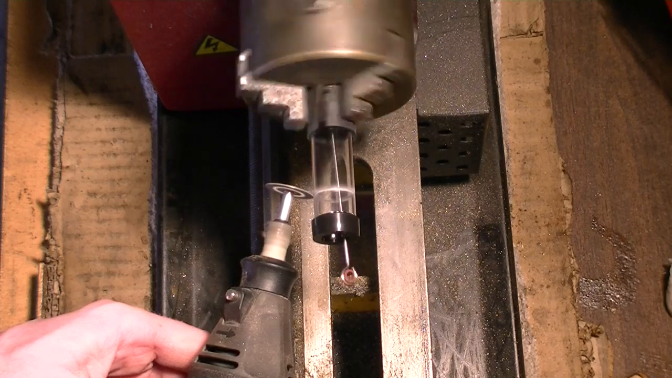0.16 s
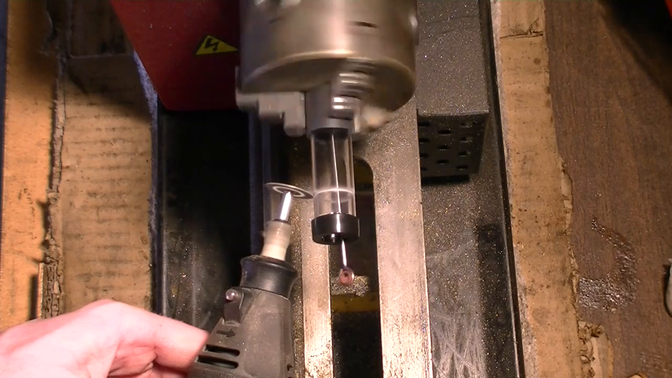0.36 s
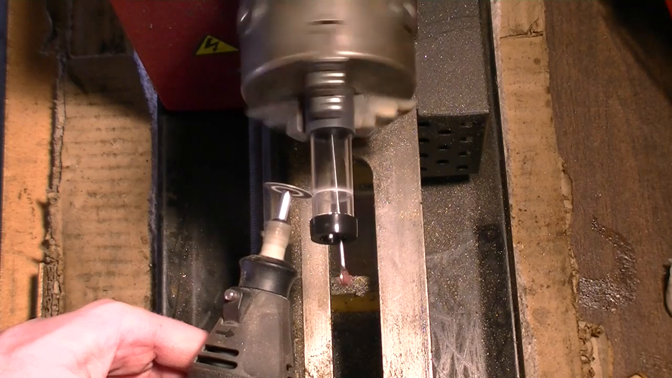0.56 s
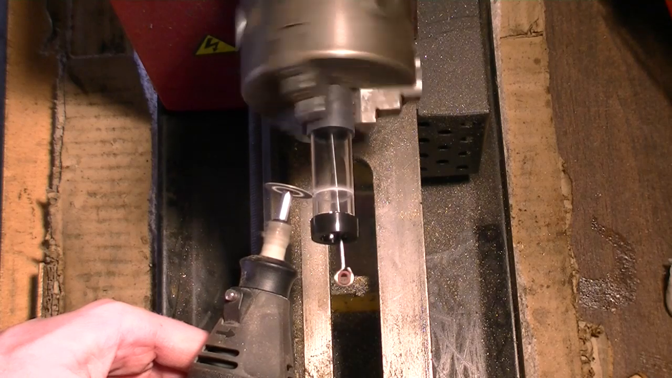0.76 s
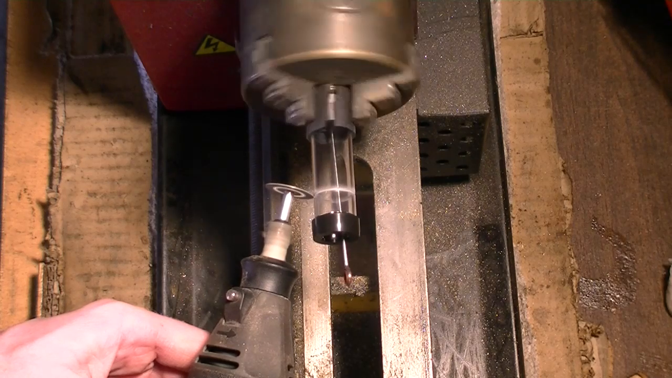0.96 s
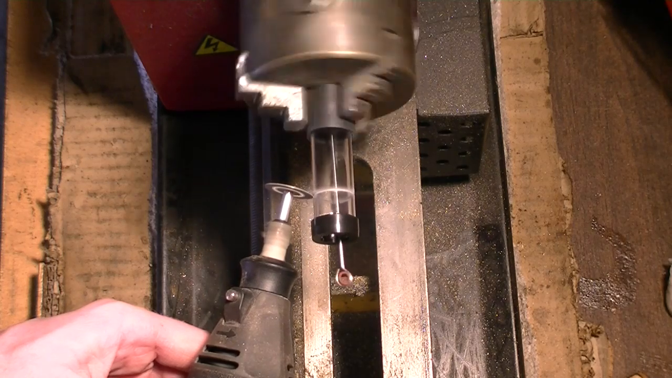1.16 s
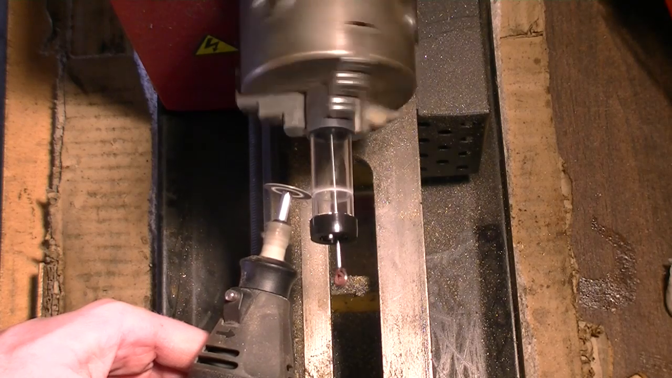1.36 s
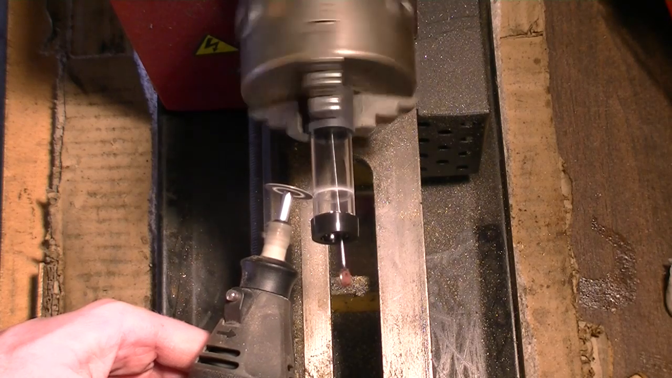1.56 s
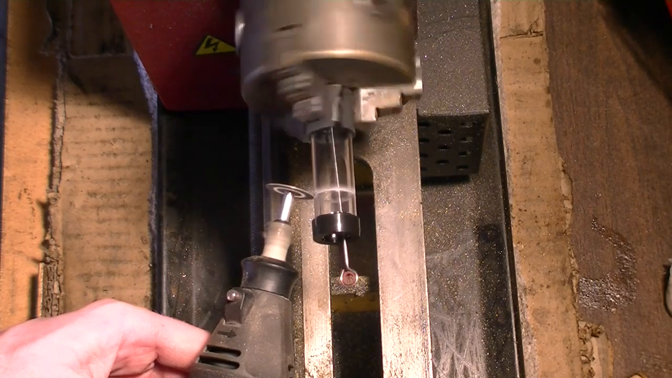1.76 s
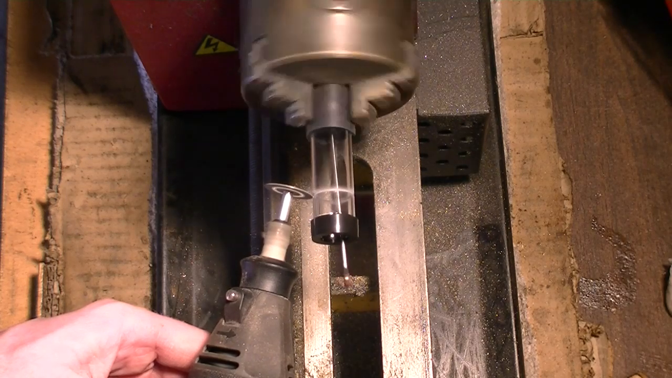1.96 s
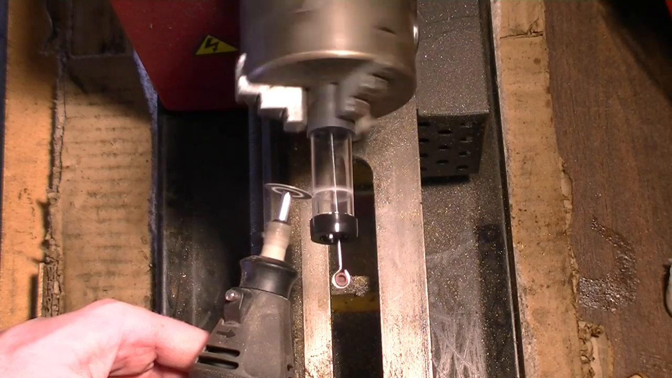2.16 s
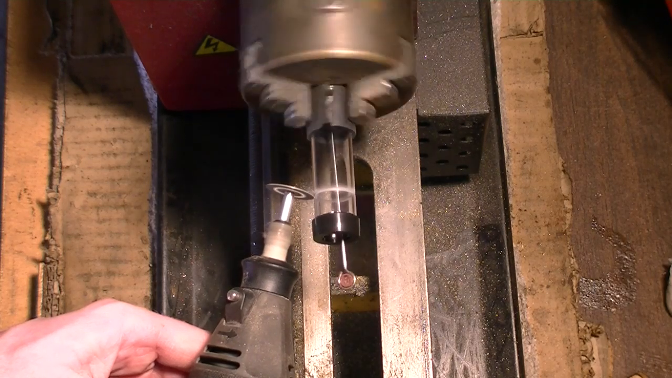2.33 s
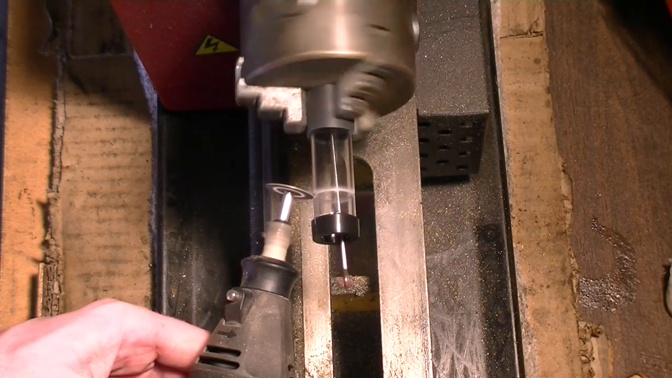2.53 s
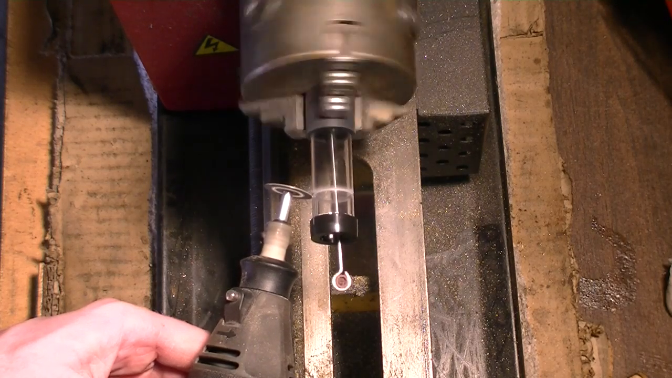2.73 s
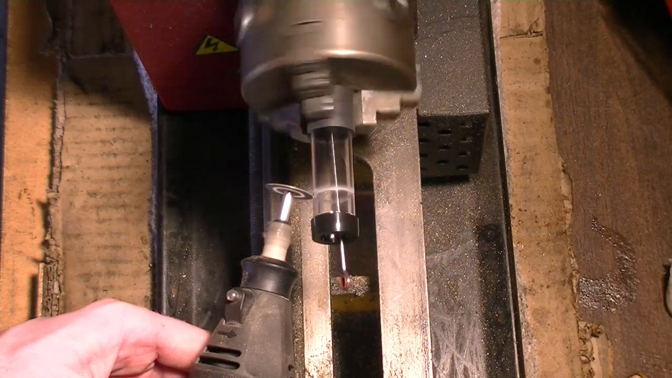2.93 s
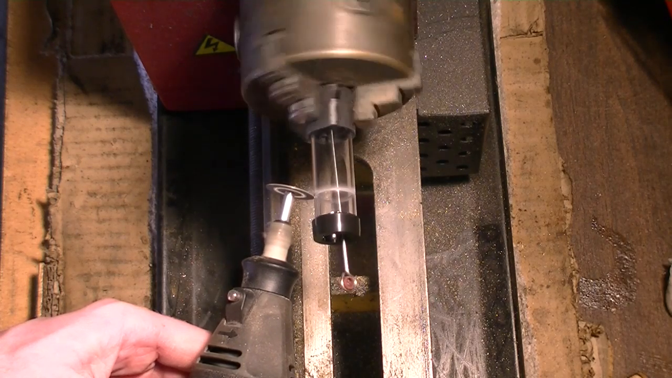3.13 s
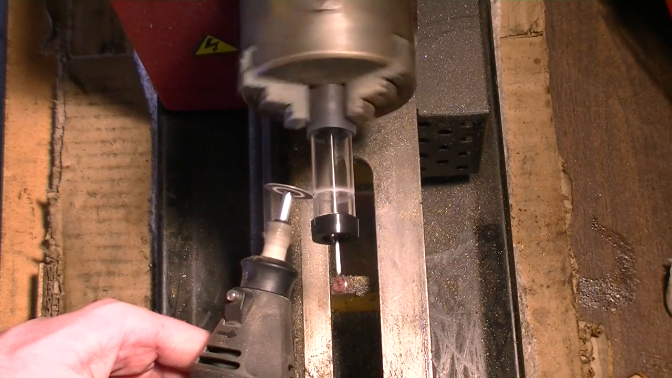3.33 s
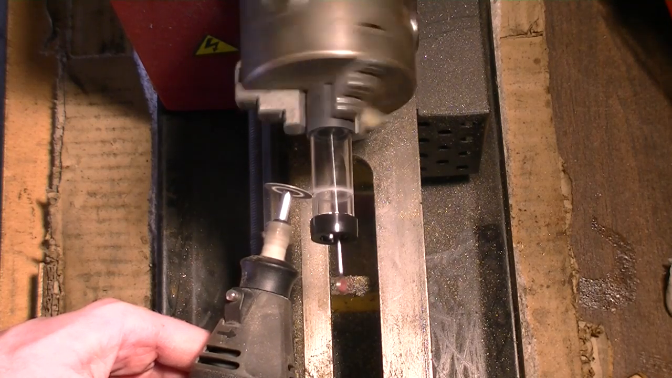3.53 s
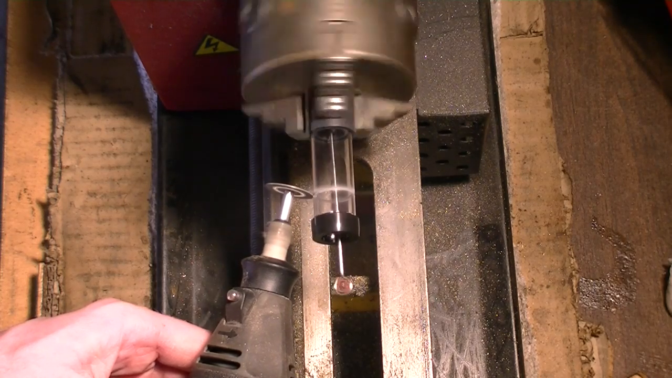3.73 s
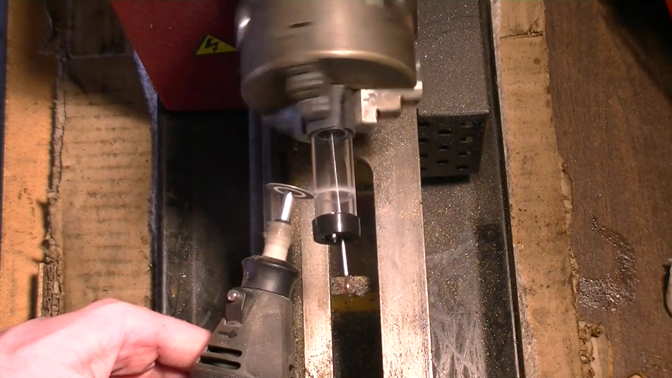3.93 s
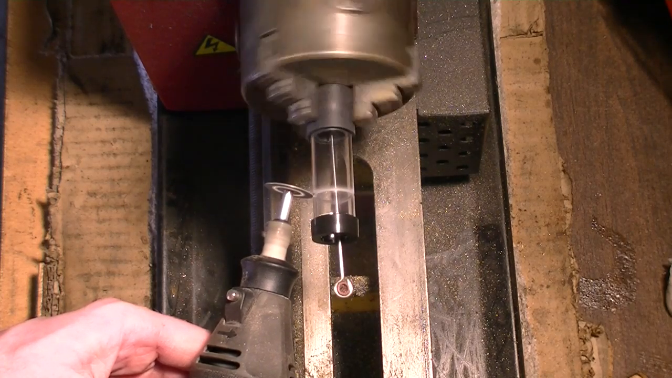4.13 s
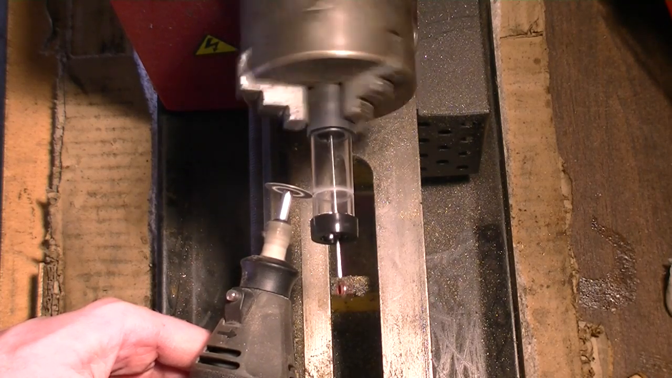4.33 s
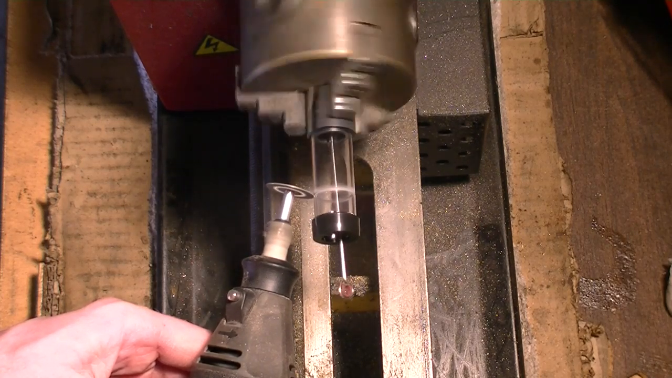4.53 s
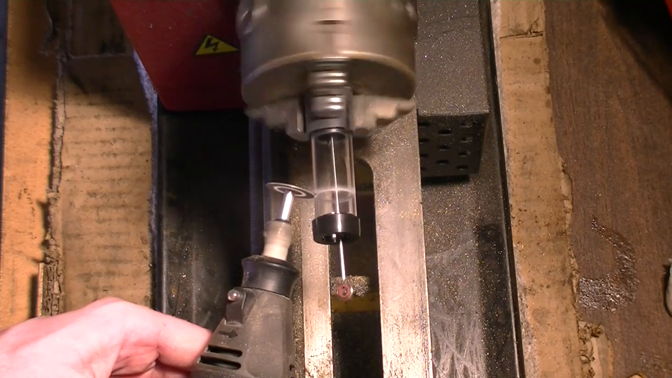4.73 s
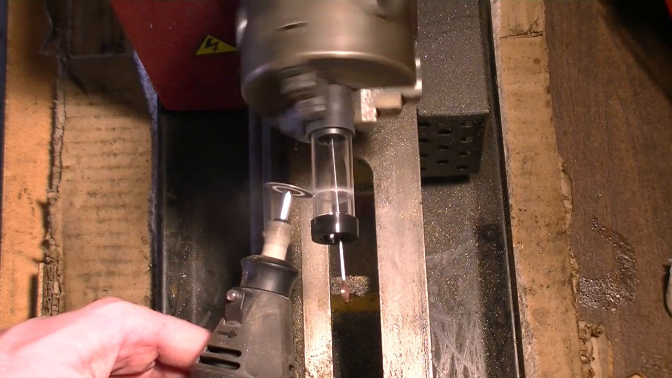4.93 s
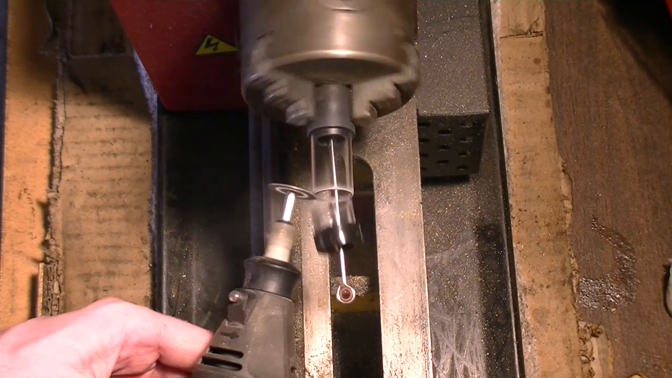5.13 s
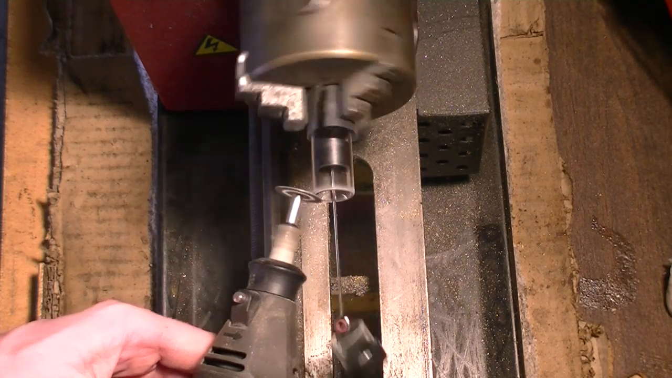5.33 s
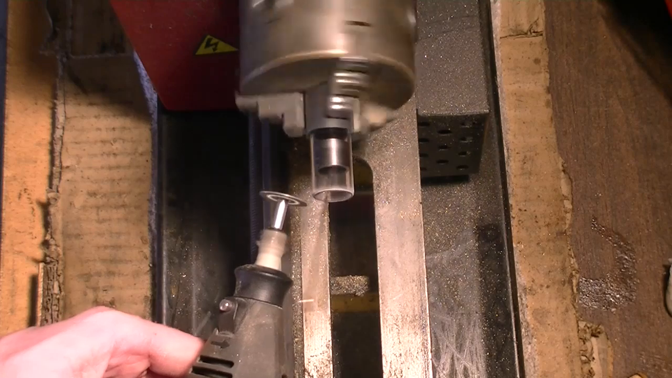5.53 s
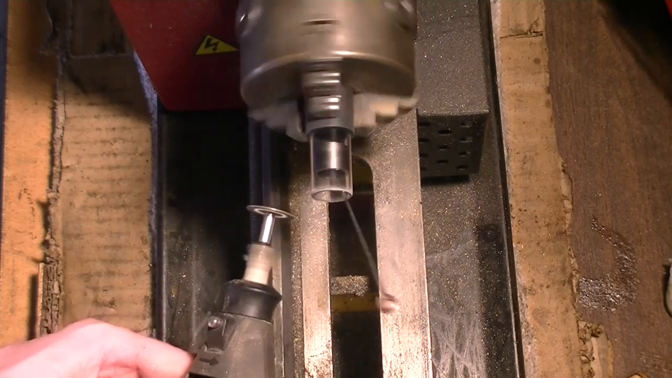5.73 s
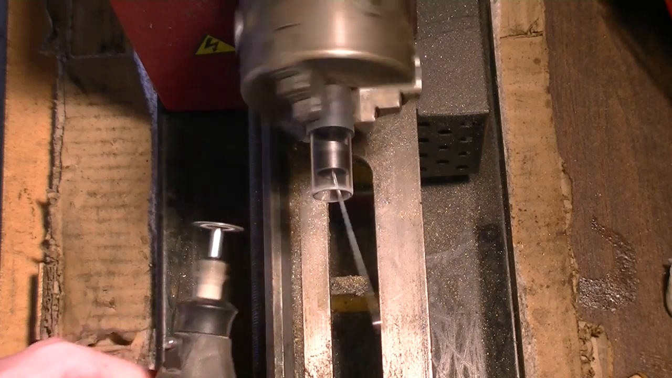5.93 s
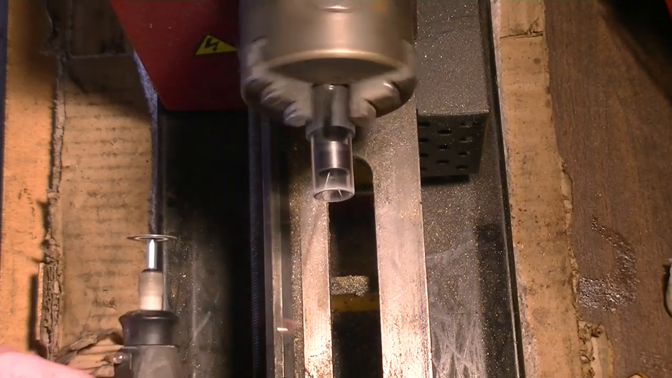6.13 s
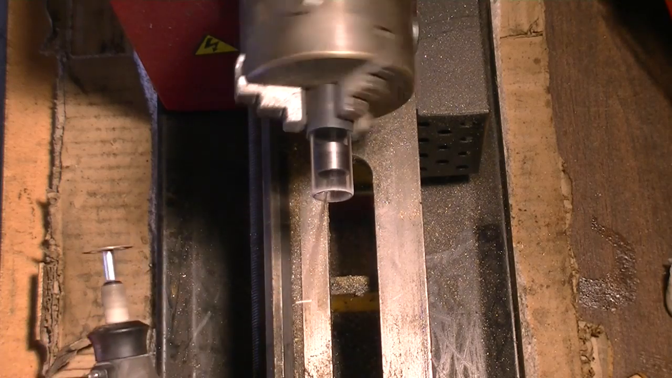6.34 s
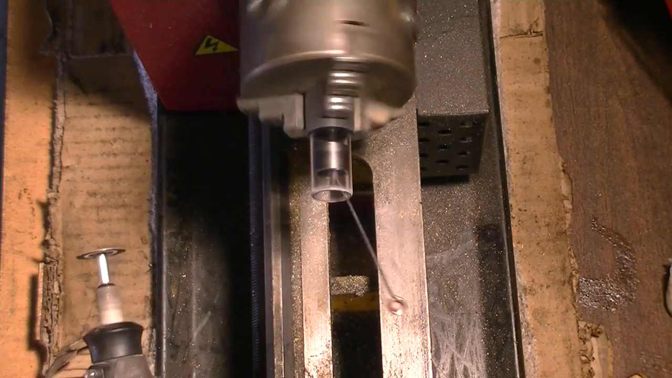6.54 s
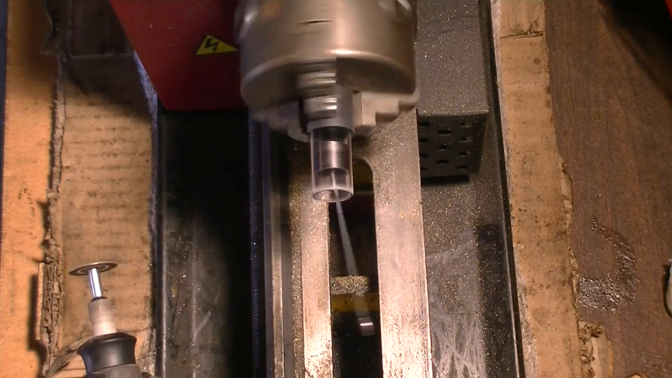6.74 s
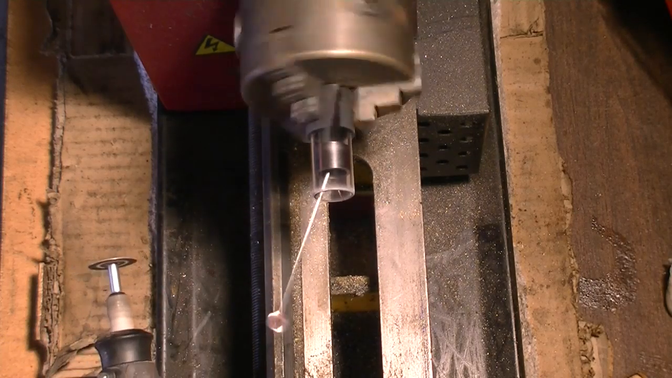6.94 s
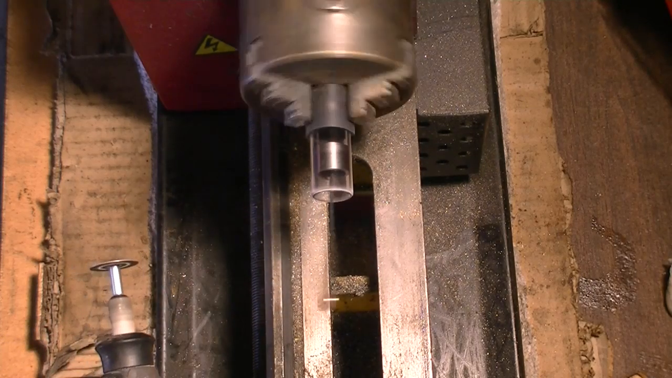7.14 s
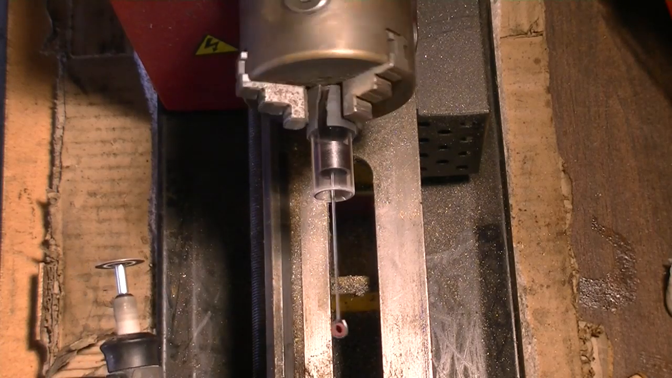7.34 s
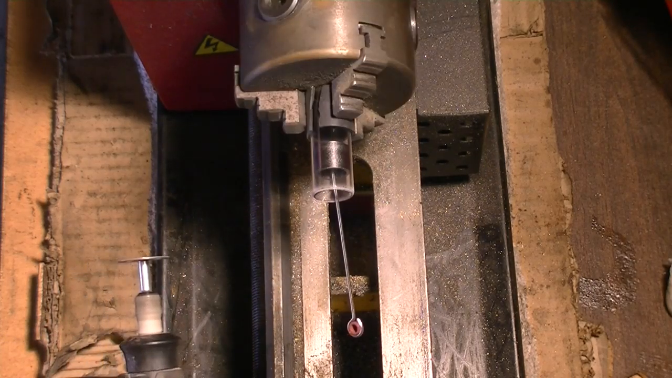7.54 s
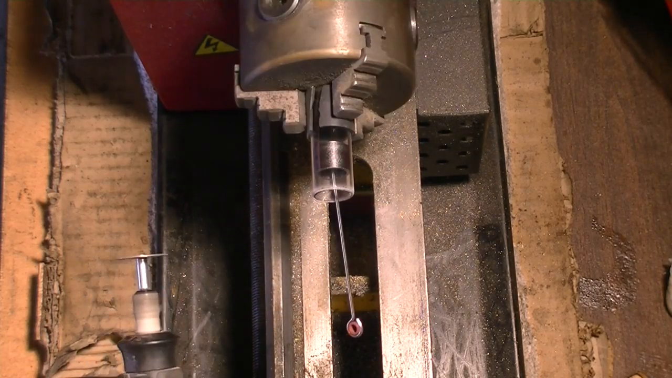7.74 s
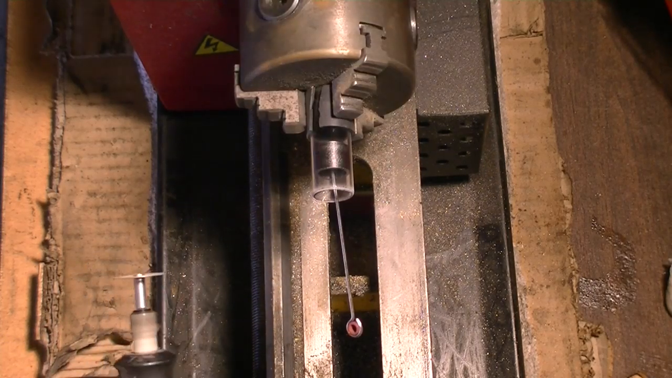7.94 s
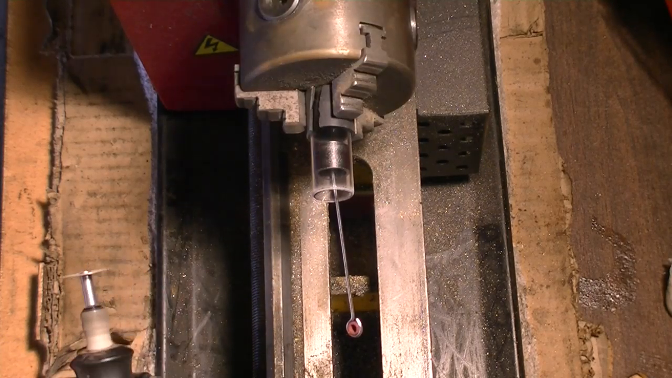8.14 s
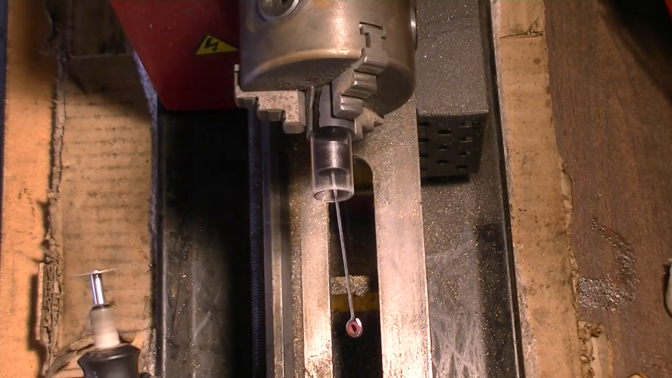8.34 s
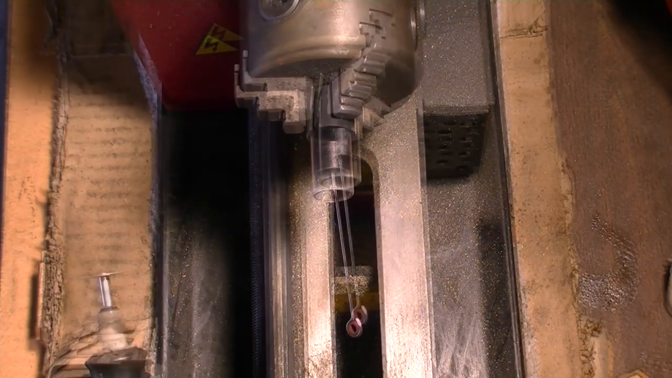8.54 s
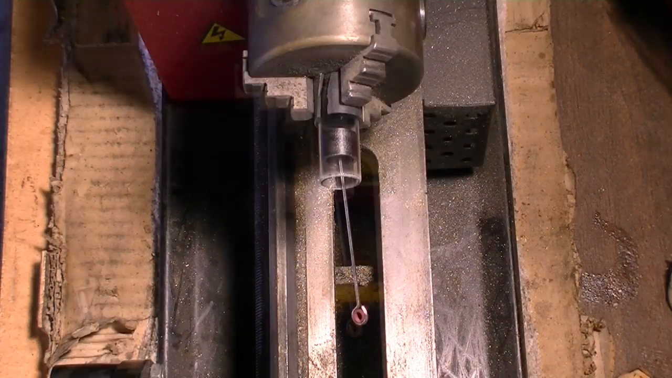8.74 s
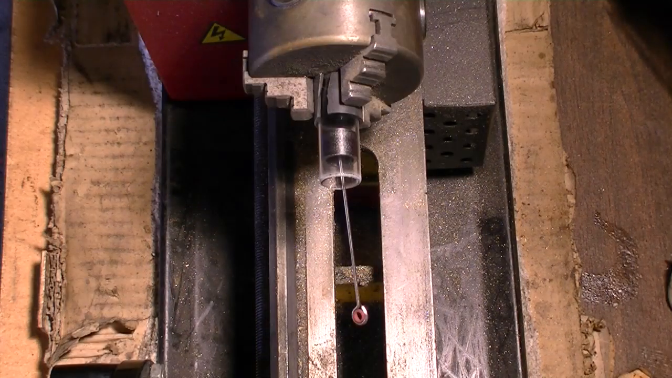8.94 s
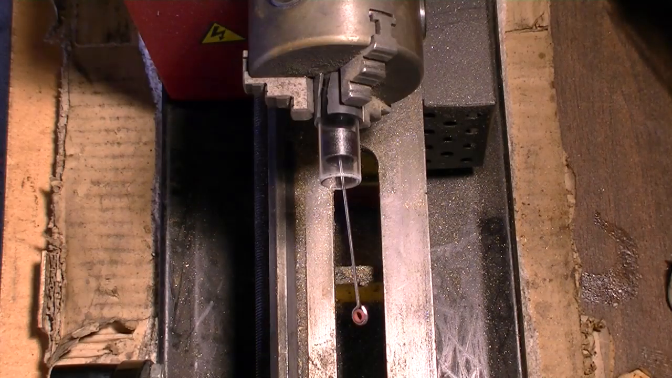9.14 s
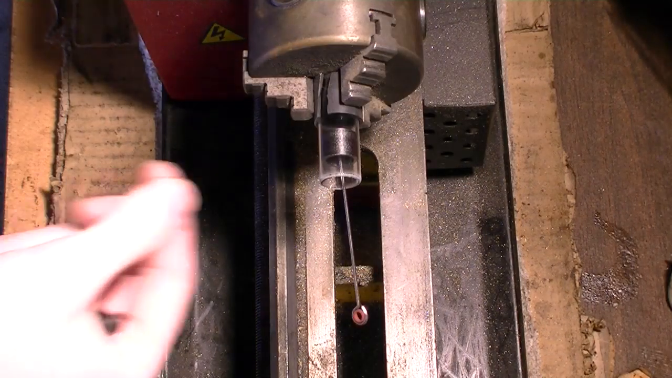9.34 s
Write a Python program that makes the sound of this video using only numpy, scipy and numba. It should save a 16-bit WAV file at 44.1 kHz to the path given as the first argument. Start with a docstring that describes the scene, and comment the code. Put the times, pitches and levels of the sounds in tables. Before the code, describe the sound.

From the start, a rotary tool's disc cuts a glass tube turning in a small lathe, heard close up in a workshop. A loud, very high squeal wavers over a gritty rasp, with shifting ringing tones from the glass. The tool's buzzing whine slowly drops in pitch under the load, and the lathe hums and rumbles underneath. At about 5.2 seconds the squeal and grinding stop as the end breaks off with a brief glassy rattle and a few small ticks. The tool speeds up to a free, airy whine. One dull knock comes at about 5.9 seconds. At 7.2 seconds a switch clicks and the lathe stops. Near 8 seconds a second click turns the tool off, and it whirrs down in pitch, dying away by about 9 seconds and leaving a low room hush.

```python
"""You hear a high squeal over a gritty rasp: a rotary tool's disc is cutting a glass tube that turns in a
small lathe. The disc scrapes the glass and makes it ring, while the whining motor slows under the load.
The end breaks off with a rattle and the tool speeds up. Something knocks, the lathe stops, and the tool
is switched off and whirrs down. An automatic volume control turns the loud grinding down and lets the
room noise come back up at the end."""
import sys
import numpy as np
from scipy import signal
from scipy.fft import rfft, irfft, next_fast_len
from scipy.io import wavfile
from scipy.ndimage import uniform_filter1d
from numba import njit

SR = 44100
rng = np.random.default_rng(int(sys.argv[2]) if len(sys.argv) > 2 else 0)


def transcribe(u):
    """Save the signal u as a 16-bit wav file named by the first command-line argument.

    u: samples, shape (n,) or (channels, n), limited to [-1, 1]; the rate is SR.
    q: integer samples, one column per channel.
    """
    v = np.clip(np.atleast_2d(u).T, -1, 1)
    q = np.round(v * 32767).astype(np.int16)
    wavfile.write(sys.argv[1], SR, q)


N = 414099
T = np.arange(N) / SR
FULL_SPEED = 382  # turns per second of the tool with nothing to cut
CUT_THROUGH_S, CUT_FADE_S, FREED_S, SWITCH_OFF_S = 5.222, 0.019, 5.24, 7.957
CUTOFF_HZ = 15650


def from_db(db):
    """Turn decibels into a number to multiply by."""
    return 10 ** (np.asarray(db) / 20)


def rms_one(x):
    """Scale a signal so that its average strength (rms) is 1."""
    return x / np.sqrt(np.mean(x ** 2) + 1e-20)


def in_time(rows):
    """Join rows that start with a time into one curve for each other column."""
    times, *columns = np.transpose(rows)
    return [np.interp(T, times, column) for column in columns]


def at_hz(points, hz):
    """Read between rows of frequency and value, with octaves evenly spaced."""
    known_hz, value = np.transpose(points)
    return np.interp(np.log(hz + 1e-3), np.log(known_hz), value)


def drift(rate_hz):
    """A smooth random wander, typically 1 away from zero."""
    r = np.exp(-200 * np.pi * rate_hz / SR)
    slow = signal.lfilter([1], [1, -2 * r, r * r], rng.standard_normal(N // 100 + 1002))[1000:]
    return np.interp(np.arange(N) / 100, np.arange(len(slow)), rms_one(slow))


def until(end_s, fade_s):
    """Stay at 1, then fade smoothly to 0 around the end time."""
    return .5 - .5 * np.tanh((T - end_s) / fade_s)


def swell(middle_s, length_s):
    """Rise quickly, hold at 1 and fall quickly."""
    return np.exp2(-np.minimum(np.abs(2 * (T - middle_s) / length_s) ** 5, 40))


def pulses(angle, sharpness):
    """One smooth bump for each turn of the angle."""
    return rms_one(np.exp(sharpness * (np.cos(angle) - 1)))


def noise(spectrum):
    """Stereo noise shaped by rows of Hz and dB, fading away below the first row."""
    # How alike the two ears are. Each row: frequency in Hz, likeness from 0 to 1.
    likeness = [(40, 1), (160, 0.52), (350, 0.67), (700, 0.92), (1300, 1), (6000, 1), (12000, 0.69)]
    size = next_fast_len(N)
    hz = np.fft.rfftfreq(size, 1 / SR)
    colour = from_db(at_hz(spectrum, hz)) * np.minimum(hz / spectrum[0][0], 1)
    mid, side = rfft(rng.standard_normal((2, size))) * colour
    alike = np.clip(at_hz(likeness, hz), 0, 1)
    stereo = np.sqrt(1 + alike) * mid + np.sqrt(1 - alike) * side * [[1], [-1]]
    return rms_one(irfft(stereo, size)[:, :N])


def out_of_step(x, lead_rad):
    """Make stereo: a wave reaches the left and right microphones out of step."""
    shift = np.exp(.5j * lead_rad * np.array([[1], [-1]]))
    return np.real(signal.hilbert(x, next_fast_len(N))[:N] * shift)


def resonate(x, hz, width_hz):
    """Ring at one pitch; a narrower width rings for longer."""
    r = np.exp(-np.pi * width_hz / SR)
    feedback = [1, -2 * r * np.cos(2 * np.pi * hz / SR), r * r]
    return signal.lfilter(np.array([1, 0, -1]) * (1 - r * r) / 2, feedback, x + 1e-18)


def ring_modes(force, modes):
    """Shake an object's modes, the pitches it rings at; white noise keeps its strength."""
    def ring(x):
        return sum((-1) ** k * from_db(db) * resonate(x, hz, width)
                   for k, (hz, width, db) in enumerate(modes))
    return ring(force) / np.std(ring(rng.standard_normal(SR)))


def strike(hits, modes, snap=.03):
    """Each hit is a sharp snap and a short dying scrape that set an object ringing."""
    force, white = np.zeros(N), rng.standard_normal(N)
    for start_s, level_db, length_s in hits:
        start = int(start_s * SR)
        decay = np.exp(-np.minimum((T[start:] - T[start]) / length_s, 20))
        force[start:] += from_db(level_db) * white[start:] * decay
        force[start] += from_db(level_db) * snap * np.sqrt(length_s * SR)
    return ring_modes(force, modes)


def room_noise(level_db=-44.5):
    """The steady, low hush of the room."""
    # The room's tone. Each row: frequency in Hz, relative level in dB.
    hush = [(15, -43), (25, -15), (86, -10.5), (172, -11), (224, -5), (363, -15), (475, -12.5),
            (621, -13.5), (856, -15), (1150, -23.5), (1630, -27), (2370, -35), (7680, -38), (15000, -59)]
    return from_db(level_db) * noise(hush)


def add_echoes(x, echo_db=-27, die_away_s=0.062, count=14):
    """A few faint echoes bounce off the bench and walls, different at each ear."""
    out = x.copy()
    for side in range(2):
        for delay_s in rng.uniform(0.01, 0.07, count):
            lag = int(delay_s * SR)
            gain = rng.choice([-1, 1]) * from_db(echo_db - 60 * delay_s / die_away_s)
            out[side, lag:] += gain * x[side, :-lag]
    return out


def lathe(rumble_db=-34, off_s=7.22):
    """The lathe's motor and gears hum and rumble until it is stopped."""
    # Motor and gear tones. Each row: pitch in Hz, level in dB.
    gear_tones = [(120, -47), (274, -41), (320, -38.5), (593, -33)]
    # The rumble. Each row: frequency in Hz, relative level in dB.
    rumble = [(40, -27), (120, -18), (280, 3), (390, -1.5), (490, 0.5), (720, -1), (1100, -15),
              (3000, -21.5)]
    ears_rad = np.array([[.5], [-.5]])
    tones = 0
    for hz, db in gear_tones:
        level = np.sqrt(2) * from_db(db + 2.6 * drift(19))
        tones += level * np.sin(2 * np.pi * hz * T + 0.8 * drift(7.8) + ears_rad)
    return until(off_s, 0.045) * (tones + from_db(rumble_db) * noise(rumble))


def switches():
    """Two switches click: first the lathe's, then the tool's."""
    # The clicks. Each row: start in seconds, level in dB, fade time in seconds.
    clicks = [(7.208, -15, 0.0074), (7.986, -5.5, 0.0024)]
    # How a switch rings. Each row: pitch in Hz, width in Hz, relative level in dB.
    switch_modes = [(3270, 400, -1), (4700, 900, -11)]
    return strike(clicks, switch_modes)


def knock(start_s=5.9255, level_db=8.5, length_s=.004):
    """Something hits the bench with one dull knock."""
    # How the knock rings. Each row: pitch in Hz, width in Hz, relative level in dB.
    knock_modes = [(473, 65, 16), (560, 260, 4), (1000, 450, 4), (1490, 160, 11), (1680, 530, 6),
                   (4840, 2000, -3), (7940, 1500, -11)]
    return strike([(start_s, level_db, length_s)], knock_modes, snap=.4)


def bench_hum(speed, angle, bench_hz=317, width_hz=29, bench_db=-26.5, hum_db=-34.5, third_db=-45):
    """The slightly off-centre disc shakes the lathe once a turn, most near the bench's own pitch."""
    response = 1 / (1 + (2 * (speed - bench_hz) / width_hz) ** 4)
    level = from_db(hum_db) + from_db(bench_db) * response
    hum = out_of_step(level * np.sin(angle), lead_rad=1.0)
    third = from_db(third_db) * np.sin(3 * angle)
    return np.sqrt(2) * until(CUT_THROUGH_S, CUT_FADE_S) * (hum + third)


def shaft_speed(tube_hz=3.665, lightest_s=.254, run_up_s=.392, drag_per_s=.41, stall_s=9.0):
    """The tool's turns per second: it slows in the cut, speeds up once free, then coasts to a stop."""
    # Slowing as the cut deepens. Each row: time in seconds, turns per second.
    loaded_speed = [(0, 369.7), (.14, 367.2), (.4, 358.4), (.62, 348), (.7, 345.2), (.82, 341.5),
                    (1.25, 334), (1.45, 333), (1.6, 331), (1.75, 329.3), (2.3, 319.9), (2.55, 318.5),
                    (2.83, 312.2), (3.0, 310.1), (3.2, 305.9), (3.5, 304.4), (3.87, 298.5), (4.05, 299.4),
                    (4.4, 293.4), (4.75, 289.4), (5.0, 281.8), (5.2, 281.1)]
    # The tube is slightly crooked, so it brakes the disc once per tube turn.
    sway = 1.18 * np.cos(2 * np.pi * tube_hz * (T - lightest_s)) * (T < FREED_S)
    sag = (FULL_SPEED - in_time(loaded_speed)[0]) * np.exp(-np.maximum(T - FREED_S, 0) / run_up_s)
    # With the power off, air drag slows it and friction takes 215 turns per second off each second.
    drag = np.exp(-drag_per_s * np.maximum(T - SWITCH_OFF_S, 0))
    friction = 215 / drag_per_s
    speed = (FULL_SPEED - sag + sway + friction) * drag - friction
    return np.maximum(speed * until(stall_s, .06), 1)


def coasting(angle, pace, between_db=-13, flicker_db=3.8, rattle_rad=.6):
    """With the power off, the motor's brushes rattle over eight contact bars: every eighth tone leads."""
    # Tones flare as they slide through the case's resonances. Each row: frequency in Hz, level in dB.
    housing = [(1000, -35), (1900, -30), (2350, -28.5), (2700, -37), (3600, -18), (4300, -21.5),
               (5000, -22.5), (5500, -22.5), (6050, -19), (6600, -21.5), (7150, -17), (7700, -26),
               (8400, -18.5), (9200, -30), (12000, -56)]
    off = slice(int((SWITCH_OFF_S - .1) * SR), N)
    whirr = np.zeros(N)
    for k in range(8, 74):
        db = at_hz(housing, k * pace[off] * FULL_SPEED) + flicker_db * drift(31)[off]
        if k % 8:
            db += between_db
        phase = k * angle[off] + rng.uniform(0, 2 * np.pi)
        rattle = rattle_rad * np.sqrt(k / 16) * drift(70)[off]
        whirr[off] += from_db(db) * np.sin(phase + rattle)
    rattling = np.clip(6 * pace - 1, 0, 1)  # the brushes go quiet at a crawl
    return whirr * rattling * pace ** 2.5 * (1 - until(SWITCH_OFF_S + 0.095, 0.05))


def motor(angle, pace, air_db=-21, hiss_db=-15, waver_db=2.5, labour_db=-11, slow_fan_db=-7.5):
    """Motor and fan tones, rushing air and hissing brushes all grow louder with speed."""
    # The tool's tones. Each entry: vibrations per turn of the shaft.
    multiples = [1, 3, 7, 13, 15, 17, 18, 20, 22, 24, 32]
    # Each entry: the base level of the matching tone in dB.
    tone_levels = [-33.5, -28.5, -36, -50, -36.5, -26, -14.5, -47, -25.5, -32.5, -34]
    # Air from the vents. Each row: frequency in Hz, relative level in dB.
    vent_air = [(60, -21.5), (180, -27), (300, -11.5), (650, -13), (950, -1.5), (1250, 1), (1700, -2),
                (2100, -9.5), (3000, -9), (6000, -33)]
    # Brush hiss, coloured by the tool's case. Each row: frequency in Hz, relative level in dB.
    brushes = [(1000, -31), (2300, -11.5), (3000, -7.5), (4100, -9), (5500, -8), (6500, -2), (7600, 2),
               (8300, 1), (9200, -5.5), (10300, -9), (11500, -16), (13000, -25), (15500, -32)]
    powered = until(SWITCH_OFF_S, .02)
    load = np.clip(10 * (1 - pace), 0, 1)
    fan_slow = .5 - .5 * np.tanh((pace * FULL_SPEED - 334) / 6)  # on below 334 turns per second
    shake = 0.0036 * drift(30)
    tones = 0
    for k, db in zip(multiples, tone_levels):
        if k == 18:  # the cooling fan
            drop_db, blur = slow_fan_db * fan_slow, 0
        else:
            drop_db, blur = labour_db * load, 0.23 * drift(44)
        # Each tone fades as it slides out of the case's resonances.
        off_tune_db = at_hz(brushes, k * pace * FULL_SPEED) - at_hz(brushes, k * 0.69 * FULL_SPEED)
        tone_db = db + drop_db * powered + waver_db * drift(10.2) + 0.222 * np.minimum(off_tune_db, 0)
        tones += from_db(tone_db) * np.sin(k * (angle + shake) + blur)
    air = from_db(air_db + 0.73 * drift(24.8)) * pace ** 3.25 * noise(vent_air)
    hiss_level = from_db(hiss_db + 0.9 * drift(27.8)) * pace ** 2.99
    hiss = hiss_level * pulses(angle, sharpness=0.084) * noise(brushes)
    unpowered = 1 - until(SWITCH_OFF_S + 0.014, 0.015)
    return np.sqrt(2) * tones * pace ** 3.4 * from_db(-5 * unpowered) + air + hiss


def magnetic_whine(angle, pace, mains_hz=60.04, band_hz=(2290, 3120), free_rad=0.35, load_rad=6.5):
    """Eight slots in the motor's spinning core sing in bursts, one at each peak of the mains current."""
    # The whine changes as the hand turns the tool.
    # Each row: time in seconds, base level of the slot tone in dB, base level of its octave in dB.
    whine_levels = [(0, -9.5, -37), (.35, -13, -35), (.8, -14, -38), (1.0, -10.5, -39), (2.5, -12.5, -33),
                    (3.5, -14, -27), (4.5, -14, -27), (5.3, -13.5, -22), (5.6, -14.5, -28.5),
                    (5.75, -11, -19), (5.9, -12.5, -30), (6.1, -13, -20), (6.25, -15, -18),
                    (6.42, -11, -14.5), (6.5, -11, -24), (6.85, -9, -17), (7.17, -11, -20.5),
                    (7.58, -11, -21), (7.8, -13, -16), (7.93, -12.5, -24)]
    slot_db, octave_db = in_time(whine_levels)
    current = 4 * np.pi * mains_hz * (T - .0005)
    # Each burst jerks the shaft and bends the pitch, more so under load.
    jerk = (free_rad + load_rad * (1 - pace)) * (1 + 0.21 * drift(6)) * np.cos(current + 0.13)
    bursts = pulses(current, sharpness=3.66) * from_db(0.3 * drift(50)) + 0.35
    housing = signal.butter(3, band_hz, "band", fs=SR, output="sos")  # the case lets one band out
    slots = signal.sosfilt(housing, bursts * np.sin(8 * angle + jerk))
    slots = from_db(slot_db) * pace ** 0.44 * out_of_step(slots, lead_rad=0.12)
    octave = pulses(current, sharpness=.7) * np.sin(16 * angle + jerk)
    octave *= from_db(octave_db) * pace ** 0.55
    return np.sqrt(2) * until(SWITCH_OFF_S - .007, 0.017) * (slots + octave)


def glass_rattle(angle):
    """The loose end bounces on the disc once a turn and rings; a few chips tick against the disc."""
    # The bouncing. Each row: time in seconds, force in dB.
    bounces = [(5.245, -68), (5.262, -22), (5.267, -5), (5.284, -9), (5.287, 4), (5.293, -0.5), (5.303, 3),
               (5.309, -3), (5.314, 5.5), (5.323, 2.5), (5.328, -2), (5.34, -9), (5.37, -26), (5.4, -80)]
    # The chips. Each row: start in seconds, level in dB, fade time in seconds.
    chips = [(5.257, 1, .002), (5.415, -18, 0.0027), (5.564, -18, 0.0061)]
    # How the glass and disc ring. Each row: pitch in Hz, width in Hz, relative level in dB.
    glass_modes = [(1160, 230, 2.5), (1760, 42, 15), (2380, 120, 16), (3580, 115, 18), (4050, 250, 9),
                   (4470, 190, 16), (5950, 540, 6.5), (7700, 860, 8), (11860, 300, 11)]
    contact = from_db(in_time(bounces)[0]) * (T > FREED_S) * pulses(angle, sharpness=0.39)
    return ring_modes(contact * rng.standard_normal(N), glass_modes) + strike(chips, glass_modes)


def grinding(speed, angle, grit_db=-5.5, wear_db=4.5, flutter_db=1.9, rough_db=2.2, edge_s=.025):
    """The disc's rough rim repeats every turn, making a stack of tones whose levels shift as it wears."""
    # The colour of the rasp. Each row: frequency in Hz, relative level in dB.
    rasp_colour = [(250, -11), (1000, -25), (1700, -13.5), (3500, -8), (5200, -6), (6700, -7), (8200, 2),
                   (9300, -1), (10900, -8), (12100, -3.5), (12900, -6.5), (13800, -20), (15000, -15),
                   (16000, -31)]
    # The rasp as the disc sinks into the glass. Each row: time in seconds, level in dB.
    rasp_levels = [(0, -6), (.4, -6.5), (1.0, -4.5), (1.4, -5), (2.3, -4.5), (2.6, -7), (2.9, -3),
                   (3.2, -7), (4.1, -6.5), (4.45, -5.5), (4.85, -7), (5.2, -2.5)]
    # The rim's tones compared with the rasp. Each row: frequency in Hz, level in dB.
    rim = [(1000, -9.5), (3000, -11.5), (6300, -11), (7600, -11), (15000, -7.5)]
    # A resonance of the glass or disc catches the nearest tone, which sings out roughly.
    # Each row: start in seconds, end in seconds, pitch in Hz, level in dB.
    rings = [(0, 1.7, 1700, -24), (0, .28, 4040, -25), (0, .3, 5870, -22), (0, .35, 8060, -15),
             (.55, 1.0, 4800, -22), (.68, 1.1, 4420, -23), (.8, 1.1, 6450, -19.5), (.8, 1.3, 7760, -15),
             (.93, 1.6, 4010, -19.5), (1.08, 1.65, 4670, -15.5), (1.09, 1.21, 3360, -12),
             (1.1, 3.9, 955, -34), (1.15, 2.9, 1950, -25.5), (1.15, 1.6, 5000, -20),
             (1.17, 1.56, 4330, -13.5), (1.33, 1.58, 3330, -16), (1.38, 1.68, 3650, -23),
             (1.55, 3.0, 1280, -31), (1.6, 2.9, 3210, -25), (1.6, 2.1, 5240, -20),
             (1.69, 1.86, 3620, -13.5), (1.7, 1.87, 4600, -14.5), (1.7, 2.25, 7160, -17),
             (1.89, 2.0, 3590, -10.5), (1.89, 1.99, 4560, -12), (1.89, 2.0, 5870, -17),
             (2.0, 2.6, 3520, -13.5), (2.0, 2.5, 4490, -16), (2.2, 2.55, 4150, -20), (2.6, 3.2, 6540, -21),
             (2.66, 2.8, 3460, -12.5), (2.7, 3.1, 4050, -20), (2.7, 3.06, 4360, -18),
             (2.8, 3.07, 3420, -19), (3.0, 5.0, 1500, -30), (3.1, 3.43, 3360, -17), (3.15, 3.6, 4570, -24),
             (3.3, 4.1, 5410, -20), (3.4, 4.5, 7770, -17), (3.43, 3.56, 3350, -13.5), (3.6, 5.1, 1760, -30),
             (4.2, 5.1, 5520, -24), (4.25, 5.1, 6680, -18), (4.6, 5.22, 6830, -15)]
    cut = slice(0, int((FREED_S + 2 * CUT_FADE_S) * SR))
    rasp = from_db(in_time(rasp_levels)[0] + 1.18 * drift(22.0))
    singing_power = np.zeros((54, N))
    for start_s, end_s, hz, db in rings:
        held = np.clip(np.minimum(T[cut] - start_s, end_s - T[cut]) / edge_s + .5, 0, 1)
        nearest = round(hz / speed[int((start_s + end_s) / 2 * SR)])
        singing_power[nearest, cut] += (from_db(db) * held) ** 2
    tones = np.zeros(N)
    for k in range(2, 54):
        hz = k * speed[cut]
        phase = k * angle[cut] + rng.uniform(0, 2 * np.pi)
        shake = k / 70 * drift(35)[cut]  # uneven contact shakes the high tones most
        tone = np.cos(phase + shake) * (hz < CUTOFF_HZ)
        unrest = np.minimum(drift(5)[cut], 1.5)
        worn_db = wear_db * min(k / 10, 1) * unrest
        scrape = rasp[cut] * from_db(at_hz(rim, hz) + at_hz(rasp_colour, hz) + worn_db)
        rough = from_db(flutter_db * unrest + rough_db * drift(70)[cut])
        tones[cut] += tone * np.sqrt(scrape ** 2 + 2 * singing_power[k, cut] * rough ** 2)
    # Loose grit hisses, hardest when the disc's high spot comes round.
    grit = from_db(grit_db) * rasp * pulses(angle, sharpness=0.36) * noise(rasp_colour)
    return until(CUT_THROUGH_S, CUT_FADE_S) * (tones + grit)


def hold_level(x):
    """Even out the loudness, as friction holds the ringing at the height that the pressure allows."""
    return x / np.sqrt(np.abs(uniform_filter1d(x ** 2, size=1800)) + 1e-6)


def squeal(speed, angle, level_db=1, tube_hz=9690, width_hz=440, surges_per_s=3.09, end_s=5.212):
    """The disc's high spot sets the tube ringing once a turn; tones near the tube's pitch stand out."""
    # The squeal drags with the disc, lets go and catches again.
    # Each row: time in seconds, centre pitch in Hz, grit compared with the ringing in dB.
    squeal_path = [(0, 9850, -9.5), (.3, 9770, -20), (.53, 9600, -8), (.63, 10030, -17), (.8, 9740, -9.5),
                   (1.05, 9720, -16), (1.4, 9830, -21), (1.85, 9620, -4.5), (2.05, 9830, -14.5),
                   (2.4, 9820, -7), (2.85, 9800, -24), (3.0, 9950, -14), (3.4, 9880, -19), (4.0, 9790, -13),
                   (4.45, 9740, -8.5), (4.75, 9720, -7), (5.0, 9800, -7), (5.15, 9800, -8)]
    # Brief flares and dips. Each row: middle in seconds, length in seconds, change in dB.
    flares = [(0.297, 0.34, 3), (0.616, 0.15, 2.5), (0.833, 0.025, -2), (1.027, 0.066, 1.5),
              (1.108, 0.032, -3), (1.54, 0.062, -4), (1.853, 0.12, -3), (2.137, 0.047, -5),
              (2.6, 0.063, 3.5), (2.935, .07, 1), (3.24, 0.1, 2.5), (3.482, 0.029, 2), (3.973, 0.086, 2),
              (4.985, 0.075, -4), (5.097, 0.07, 5.5)]
    centre_hz, grit_db = in_time(squeal_path)
    ring = 0
    for k in range(24, 38):
        response = (1 + (2 * (k * speed - centre_hz) / width_hz) ** 2) ** -1.15
        wear = from_db(2.0 * drift(2.7))
        ring += response * wear * np.cos(k * angle + .48 * drift(25.5))
    scratches = pulses(angle + np.pi / 2, sharpness=2.5) * rng.standard_normal(N)
    grit = resonate(resonate(scratches, tube_hz, width_hz=670), tube_hz, width_hz=790)
    burst_strength = from_db(1.7 * drift(294))  # each turn's burst is a little different
    ring = hold_level((hold_level(ring) + from_db(grit_db) * rms_one(grit)) * burst_strength)
    # The squeal rises slightly with regular surges of pressure on the disc.
    surge_db = 0.28 * np.cos(2 * np.pi * surges_per_s * (T + .01))
    flare_db = sum(db * swell(middle_s, length_s) for middle_s, length_s, db in flares)
    ring *= from_db(level_db + surge_db + 1.5 * drift(5.9) + flare_db) * until(end_s, .008)
    lean_right_db = np.array([[-1], [1]]) * (0.9 + 1.1 * drift(1.45))
    return out_of_step(ring, lead_rad=0.57) * from_db(lean_right_db)


def scene():
    """Mix the tool, the glass, the knock, the switches and the lathe over the room's hush."""
    speed = shaft_speed()
    angle = 2 * np.pi * np.cumsum(speed) / SR  # how far the shaft has turned, in radians
    pace = speed / FULL_SPEED  # 1 at full speed
    tool = motor(angle, pace) + magnetic_whine(angle, pace) + coasting(angle, pace)
    glass = grinding(speed, angle) + squeal(speed, angle) + bench_hum(speed, angle) + glass_rattle(angle)
    return add_echoes(tool + glass + knock() + switches() + lathe()) + room_noise()


@njit
def follow(wanted, attack_s, release_s):
    """Rise quickly towards the wanted volume cut and sink back slowly."""
    out, now = np.empty_like(wanted), wanted[:2000].max()
    for i in range(len(wanted)):
        now += (wanted[i] - now) / (SR * (attack_s if wanted[i] > now else release_s))
        out[i] = now
    return out


def excess_db(power, ceiling_db):
    """How far the smoothed power is above the ceiling."""
    smooth = signal.lfilter(np.ones(128) / 128, 1, power)
    return np.maximum(10 * np.log10(smooth + 1e-12) - ceiling_db, 0)


def record(dry, ceiling_db=-14, treble_weight=2.03):
    """Turn loud sound down, above all when shrill; catch knocks, round peaks and cut the top treble."""
    mid = dry.mean(0)
    treble = np.diff(mid, prepend=0)
    power = mid ** 2 + treble_weight * treble ** 2
    slow_db = follow(excess_db(power, ceiling_db), attack_s=0.0051, release_s=0.42)
    ducked = mid * from_db(-slow_db)
    quick_db = follow(excess_db(ducked ** 2, ceiling_db), attack_s=0.0016, release_s=0.021)
    balance_db = np.array([[-0.23], [0.23]])
    held = dry * from_db(balance_db - slow_db - quick_db)
    rounded = .75 * np.tanh(held / .75)
    return signal.sosfilt(signal.ellip(10, .2, 80, CUTOFF_HZ, fs=SR, output="sos"), rounded)


dry = scene()
out = record(dry)
transcribe(out)
```